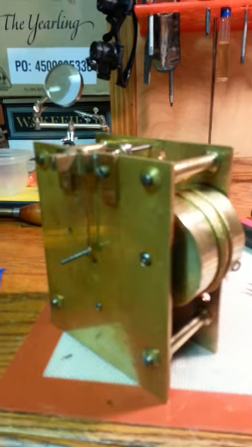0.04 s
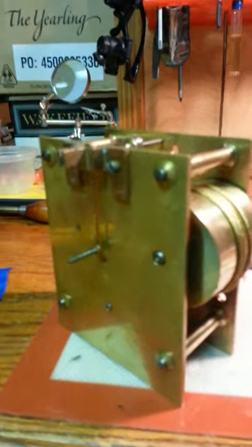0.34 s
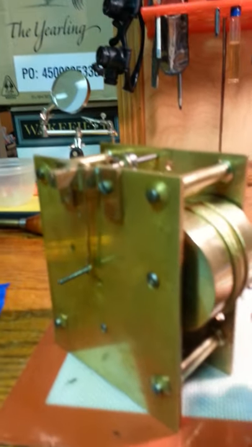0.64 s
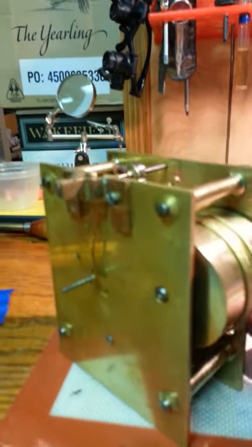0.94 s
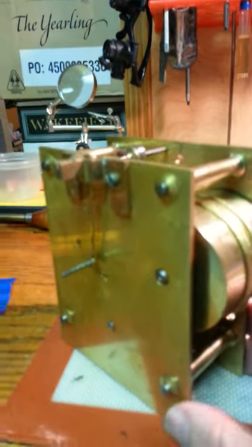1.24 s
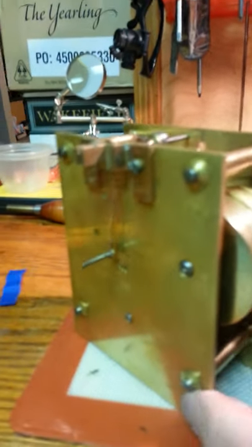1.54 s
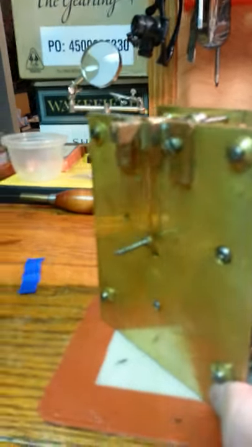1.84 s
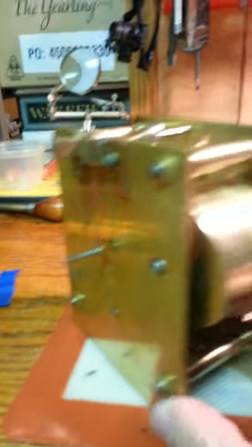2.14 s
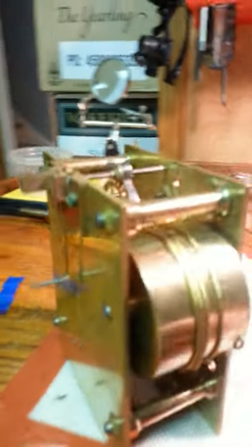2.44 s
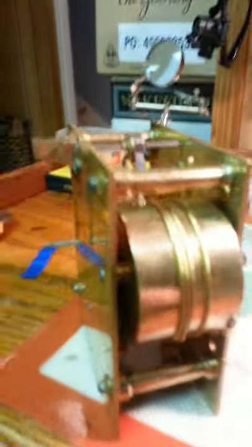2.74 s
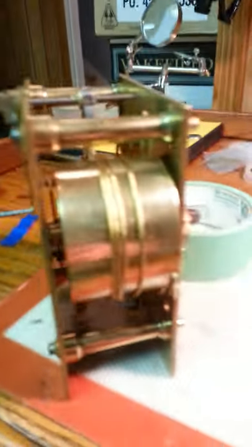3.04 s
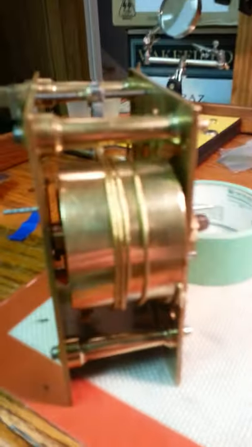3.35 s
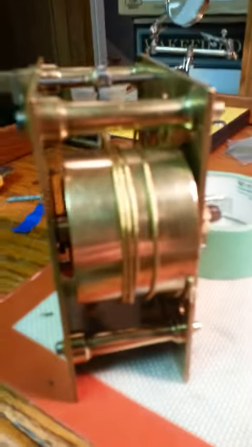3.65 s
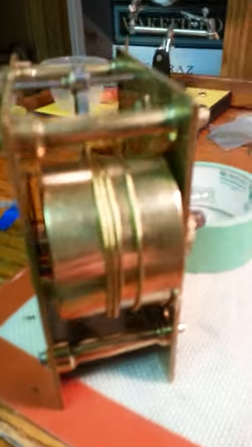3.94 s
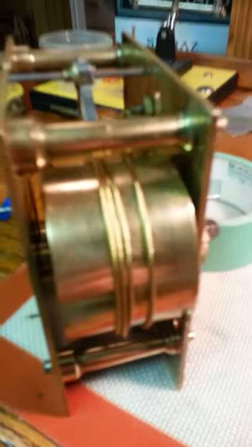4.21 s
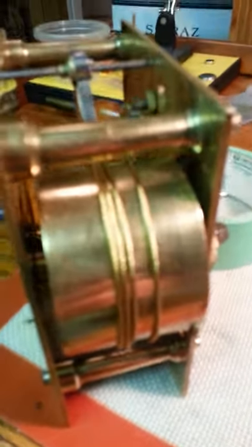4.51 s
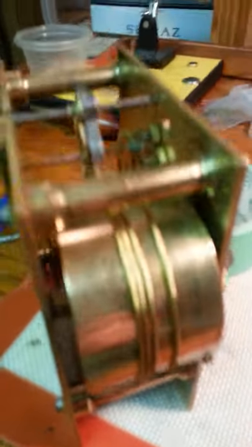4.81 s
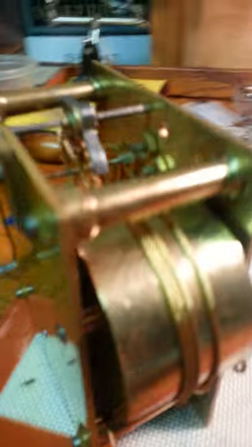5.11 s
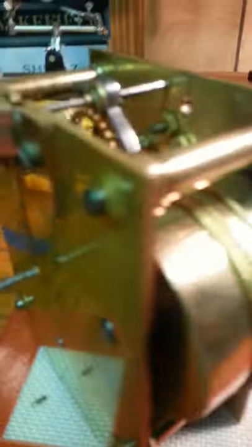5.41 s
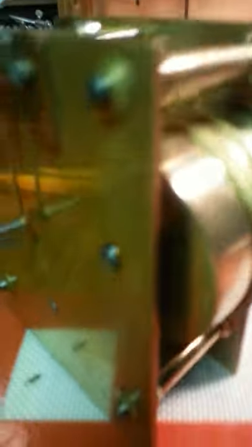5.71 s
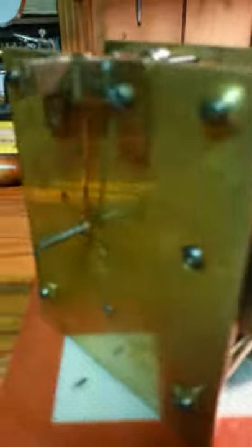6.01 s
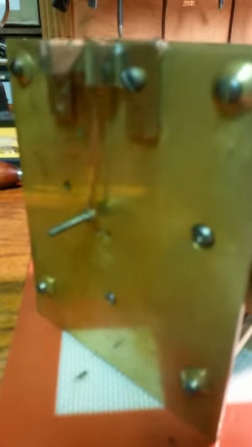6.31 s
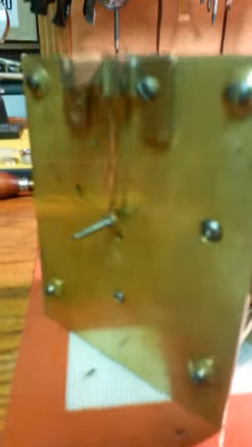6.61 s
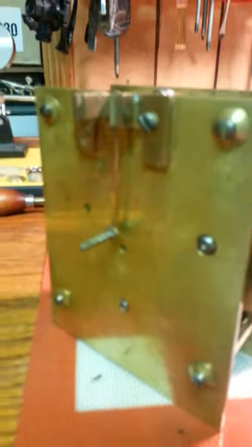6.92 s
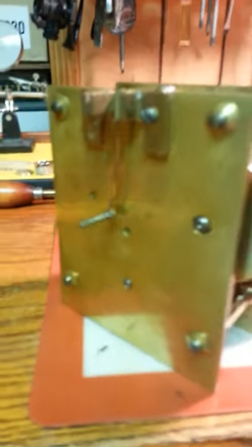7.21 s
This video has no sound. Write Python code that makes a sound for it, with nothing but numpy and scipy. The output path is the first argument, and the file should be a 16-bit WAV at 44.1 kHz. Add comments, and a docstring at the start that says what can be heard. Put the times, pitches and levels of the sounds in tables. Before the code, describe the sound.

Rapid, limping tick-tock of a small clockwork mechanism up close, bright and slightly ringing, with a brief finger bump and rub.

```python
"""Clock movement on a wooden bench

A brass movement ticks fast and out of beat, close to the microphone of a hand-held camera moving round it.
At each beat a tooth slides off its pallet, drops on the other and bounces, ringing the plates and one
steel part and thumping the bench top. Fingers bump and rub now and then. Mains hum and room noise lie
beneath; the camera's noise suppressor lets them swell with every tick."""
import sys
import numpy as np
from scipy import signal
from scipy.fft import rfft, irfft, next_fast_len
from scipy.io import wavfile
from scipy.ndimage import map_coordinates

SR = 44100
rng = np.random.default_rng(int(sys.argv[2]) if len(sys.argv) > 2 else 0)


def transcribe(u):
    """Save the signal u as a 16-bit wav file named by the first command-line argument.

    u: samples, shape (n,) or (channels, n), limited to [-1, 1]; the rate is SR.
    q: integer samples, one column per channel.
    """
    v = np.clip(np.atleast_2d(u).T, -1, 1)
    q = np.round(v * 32767).astype(np.int16)
    wavfile.write(sys.argv[1], SR, q)


N = 320210
TIME = np.arange(N) / SR
TAIL = TIME[:SR // 5]  # time axis of one short sound

# swings of the anchor, uneven with no pendulum to pace it: tick_s, tock_s
SWINGS = [(.271, .363), (.540, .627), (0.78, .881), (1.044, 1.137), (1.305, 1.398), (1.592, 1.679),
          (1.833, 1.918), (2.079, 2.174), (2.317, 2.409), (2.575, 2.662), (2.817, 2.902), (3.042, 3.128),
          (3.272, 3.365), (3.519, 3.611), (3.771, 3.853), (3.991, 4.073), (4.205, 4.288), (4.437, 4.529),
          (4.693, 4.775), (4.919, 5.000), (5.133, 5.215), (5.361, 5.446), (5.596, 5.689), (5.864, 5.957),
          (6.105, 6.189), (6.335, 6.422), (6.569, 6.663), (6.818, 6.908), (7.051, 7.137)]
# spectrum of the crowd of close modes in frame and bench: frequency_hz, density_db
CLATTER = [(90, -25.5), (240, -2), (360, -7), (560, -12), (1050, -21), (1400, -11.5), (1680, -13.5),
           (2300, -3), (3400, -9.5), (4400, 2.5), (5200, -7.5), (6700, 6.5), (8500, -3.5), (10000, -6.5),
           (11500, -11.5), (14400, -20)]


def amp(db):
    """Decibels to amplitude."""
    return 10 ** (np.asarray(db) / 20)


def unit(x):
    """x scaled to rms 1."""
    return x / np.sqrt(np.mean(x ** 2) + 1e-20)


def fade(t, t60):
    """Exponential decay, silent before t = 0."""
    return (t >= 0) * amp(-60 * np.abs(t) / t60)


def along(points, hz):
    """Interpolate (frequency_hz, value) points on a log axis."""
    knots_hz, values = np.transpose(points)
    return np.interp(np.log(hz + 1), np.log(knots_hz + 1), values)


def filtered(x, response):
    """x through a filter whose gain is response(hz)."""
    n = x.shape[-1]
    size = next_fast_len(n + SR // 10)
    return irfft(rfft(x, size) * response(np.fft.rfftfreq(size, 1 / SR)), size)[..., :n]


def smooth(x, seconds):
    """Running mean under a bell."""
    bell = signal.windows.hann(int(seconds * SR))
    padded = np.pad(x, len(bell), "edge")
    return signal.fftconvolve(padded, bell / bell.sum(), "same")[len(bell):-len(bell)]


def wobble(rate):
    """A smooth random curve, rate knots a second."""
    return map_coordinates(rng.standard_normal(int(N * rate / SR) + 4), [TIME * rate])


def sides(pan_db):
    """Left and right gains of mean power 1; pan_db is left minus right."""
    gains = amp([pan_db / 2, -pan_db / 2])
    return gains / np.sqrt(np.mean(gains ** 2, axis=0))


def noise(n, spectrum_db):
    """Coloured stereo noise of rms 1, alike in the bass and unrelated in the treble."""
    # likeness of left and right at the microphone: frequency_hz, correlation
    likeness = [(60, 0), (180, 0.7), (400, 0.42), (900, 0.3), (2000, 0.035)]

    def mid_side_gains(hz):
        turn = np.arccos(np.clip(along(likeness, hz), -1, 1)) / 2
        return amp(spectrum_db(hz)) * [np.cos(turn), np.sin(turn)]

    mid, side = filtered(rng.standard_normal((2, n)), mid_side_gains)
    return unit(np.array([mid + side, mid - side]))


def add(out, start_s, x):
    """Mix x into out from start_s."""
    i = int(start_s * SR)
    out[:, i:i + x.shape[1]] += x[:, :N - i]


def blows(times, db):
    """A train of impulses."""
    return np.bincount((np.ravel(times) * SR).astype(int), amp(db) * np.ones(np.size(times)), N)


def room(air_db=-53, hum_db=-62, waver_db=1.0):
    """Steady room noise and a slightly wavering mains hum."""
    # partials of the hum: pitch_hz, relative_db
    partials = [(179.5, 5), (360, -10)]
    # spectrum of the room noise: frequency_hz, density_db
    air = [(25, 11), (60, -2), (120, 7), (250, 3.5), (500, -1.5), (1000, -7), (3000, -7), (7000, -5),
           (14000, -8)]
    hum = sum(amp(db) * np.sqrt(2) * np.sin(2 * np.pi * hz * TIME) for hz, db in partials)
    hum *= amp(hum_db + waver_db * wobble(4.4))
    return hum + amp(air_db) * noise(N, lambda hz: along(air, hz))


def rustle(grain_db=3):
    """Skin sticks and slips in small grains; each rub swells and dies away."""
    # spectrum of rubbing skin: frequency_hz, density_db
    colour = [(60, 4), (300, -6), (1000, -4), (3000, -7), (7000, 0), (10000, -5), (14000, -22)]
    # fingers on the mat and the camera body: middle_s, level_db, half_length_s
    rubs = [(2.023, -47, 0.074), (2.3, -57.5, 0.046), (2.397, -45, 0.1)]
    grains = unit(noise(N, lambda hz: along(colour, hz)) * amp(grain_db * wobble(310)))
    return grains * sum(amp(db) * np.exp(-((TIME - s) / half) ** 2) for s, db, half in rubs)


def handling(rise_cycles=1.4):
    """Hand bumps, slower and narrower the lower they are; a few light clicks and one brief wheel scrape."""
    # the hand on bench and camera: start_s, level_db, centre_hz, t60_s
    bumps = [(0.319, -46.5, 440, 0.028), (1.008, -47.5, 700, .1), (1.754, -49.5, 388, .032),
             (1.983, -43, 114, 0.22), (2.01, -31, 87, 0.15), (2.4249, -35.5, 556, .11),
             (2.457, -43.5, 490, .14), (5.2226, -42, 378, 0.07)]
    # light clicks and, at 5.165 s, a brief scrape of a wheel: start_s, level_db, t60_s
    clicks_and_scrape = [(1.575, -39.5, 0.027), (1.759, -40, 0.2), (3.838, -27.5, 0.01), (5.165, -39, 0.24),
                         (5.344, -37, 0.033)]
    out = np.zeros((2, N))
    for s, db, centre, t60 in bumps:
        octaves = 1.25 * (centre / 500) ** .7  # half width: harder, higher bumps are broader
        band = noise(len(TAIL), lambda hz: -10 * np.log10(1 + (np.log2((hz + 1) / centre) / octaves) ** 6))
        push = band * (1 - np.exp(-TAIL * centre / rise_cycles)) * fade(TAIL, t60)
        add(out, s, amp(db) * push / push[:, :SR // 50].std())
    for s, db, t60 in clicks_and_scrape:
        add(out, s, amp(db) * noise(len(TAIL), lambda hz: along(CLATTER, hz)) * fade(TAIL, t60))
    return out


def bench(pitch_hz=177, t60=.17, level_db=-51):
    """Every beat thumps the bench top, which booms briefly at its low resonance."""
    t = TIME[:SR // 2]
    boom = np.sin(2 * np.pi * pitch_hz * t) * fade(t, t60)
    return signal.oaconvolve(blows(SWINGS, level_db), boom)[:N]


def steel(swell_s=0.039, waver_db=2, faint_db=-55, pan_db=4.5):
    """A steel part takes up each blow slowly; some beats set it singing, and one mode lingers."""
    # its lightly damped modes: pitch_hz, gain_db, t60_s, growth_db_per_db of a harder blow
    modes = [(5571, -7, 1.4, 1.45), (5583, 21, .13, 1)]
    # beats that set it singing: start_s, force_db
    hard_blows = [(1.045, -45), (1.307, -45.5), (1.401, -50), (3.04, -39), (3.274, -45), (3.518, -50),
                  (3.772, -46.5), (3.992, -52), (4.207, -48), (5.135, -36.5), (5.36, -39), (5.596, -32.5),
                  (5.691, -37.5), (6.189, -47.5), (7.053, -48)]
    t = TIME[:SR]
    times, db = np.transpose(hard_blows)
    swell = 1 - np.exp(-(t / swell_s) ** 2)
    out = np.zeros((2, N))
    for hz, gain_db, t60, growth in modes:
        tone = np.sin(2 * np.pi * hz * t + [[0], [1]])  # the right side leads by a radian
        ring = amp(gain_db) * fade(t, t60) * tone * swell
        force = blows(SWINGS, faint_db) + blows(times, db.max() + growth * (db - db.max()))
        out += signal.oaconvolve(force[None], ring, axes=1)[:, :N]
    return out * amp(waver_db * wobble(40)) * sides(pan_db)[:, None]


def dense_ring(crack_db=8, crack_t60=0.0098):
    """The crowd of close modes after one blow: a sharp direct crack, then a tail that dies by frequency."""
    # decay of frame and bench together: frequency_hz, t60_s
    ring_times = [(200, 0.086), (700, 0.26), (2000, 0.14), (6000, 0.09), (13000, 0.052)]
    hz, t, spectra = signal.stft(noise(len(TAIL), lambda hz: along(CLATTER, hz)), SR, nperseg=128)
    spectra *= fade(t, along(ring_times, hz)[:, None])
    tail = signal.istft(spectra, SR, nperseg=128)[1][:, :len(TAIL)]
    return unit(tail * (1 + amp(crack_db) * fade(TAIL, crack_t60)))


def contacts(slide_s, unlock_db=-10, slide_db=-7, rise_db=8, bounce_t60=0.059, gap_s=.0019, bounces=7):
    """Forces of one beat: the tooth unlocks, scrapes ever harder along the pallet, drops and chatters."""
    force = np.zeros(len(TAIL))
    drop = int(slide_s * SR) + 1
    scrape = rng.standard_normal(len(TAIL))[:drop] ** 3 * amp(rise_db * np.linspace(0, 1, drop))
    force[:drop] = amp(slide_db) * scrape / np.linalg.norm(scrape)
    force[0] += amp(unlock_db)
    force[drop] += .8
    after_s = np.cumsum(gap_s * rng.uniform(.5, 1.5, bounces))
    # the wheel's weight follows the first touch, so the second contact is the hardest
    chatter = fade(after_s - after_s[0], bounce_t60) * rng.choice([-1, 1], bounces)
    force[drop + (after_s * SR).astype(int)] += chatter
    return force


def beats():
    """Yield each beat's time, slide and band levels; a late swing has a weaker tick, a stronger tock."""
    # the pallets, tick then tock: slide_s, plate_db, treble_db, loss_db_per_s of lateness
    pallets = [(.0038, -39.5, -34.5, 37), (.0013, -39, -31.5, -10)]
    periods = np.diff(np.array(SWINGS)[:, 0])
    lateness = np.r_[0, periods - periods.mean()]
    for swing, late_s in zip(SWINGS, lateness):
        for drop_s, (slide_s, plate_db, treble_db, loss) in zip(swing, pallets):
            yield drop_s, slide_s, plate_db - loss * late_s, treble_db - loss * late_s


def escapement(scatter_db=2.0, detune_hz=14, steady_db=-2, split_hz=5300, top_hz=8800):
    """Each beat rings the same frame; the microphone's angle and nearness set its modes, level and pan."""
    # modes of the brass frame and its wheels: pitch_hz, front_db, open_side_db, t60_s
    frame = [(575, -26, -9, .14), (1390, -6, -11, .13), (2015, -3, 5, .12), (2085, -9, 0, .1),
             (2295, -3, -11, .12), (2870, -9, -17, .12), (3470, -18, -19, .17), (3890, -8, -3, .13),
             (4063, -6, -4, .16), (4272, -7, 3, .11), (4525, -12, -3, .1), (5755, -6, -4, .14),
             (6390, 2, -15, .11), (6584, 0, -3, .12), (7030, -4, -3, .1), (7260, -4, -6, .14),
             (7500, -12, -4, .16), (7840, -19, -6, .16), (8091, 2, -2, .13), (8254, -9, 0, .12),
             (8519, 3, -1, .12), (8894, -9, -6, .13), (9390, -8, -16, .13), (9601, -11, -14, .13),
             (10053, -7, -10, .14), (10500, -14, -12, .13), (10800, -14, -23, .13), (14100, -15, -24, .1)]
    # the microphone's path: time_s, angle (0 front plate, 1 open side), nearness_db
    path = [(.3, 0.029, -1), (1.15, .02, 1.1), (1.6, .05, -1), (2.05, 0.033, 1), (2.65, 0.79, -0.04),
            (3.3, 0.98, 1.57), (4.6, 0.87, 0.5), (5.45, 0.46, 2.5), (6.15, 0.27, 3.5), (7.1, 0.12, 2.04)]
    # stereo lean of a tick within each band: frequency_hz, pan_db
    tilt = [(250, 1), (1500, 2), (2400, 5), (4500, 4), (6000, 0), (6800, -10), (8500, -12), (11500, -8)]
    hz, front_db, open_db, t60 = np.transpose(frame)
    path_s, angles, nearness = np.transpose(path)
    phase = rng.uniform(0, 2 * np.pi, (2, len(hz), 1))
    decay = fade(TAIL, t60[:, None])
    # part of the treble ring repeats; fresh random clatter varies each beat
    steady = filtered(dense_ring(), lambda f: 1 / (1 + (5000 / (f + 1)) ** 8))
    out = np.zeros((2, N))
    for drop_s, slide_s, plate_db, treble_db in beats():
        angle = np.interp(drop_s, path_s, angles)
        near_db = np.interp(drop_s, path_s, nearness)
        pitch = hz + detune_hz * rng.standard_normal(len(hz))  # random detuning: the ring sounds less pure
        modes = np.sin(2 * np.pi * pitch[:, None] * TAIL + phase) * decay
        mode_db = front_db + angle * (open_db - front_db) + scatter_db * rng.standard_normal(len(hz))
        ring = amp(-4 + 3.5 * angle) * unit(amp(mode_db) @ modes)  # clearer at the open side
        response = amp(steady_db) * steady + dense_ring() + ring
        tick = signal.fftconvolve(response, contacts(slide_s)[None], axes=1)[:, :len(TAIL)]
        # close up, the highest treble gains extra
        top_lift = lambda f: amp(1.1 * near_db * np.clip(2 * (f / top_hz - 1), 0, 1))
        tick = filtered(tick, lambda f: sides(along(tilt, f)) * top_lift(f))
        plate = filtered(tick, lambda f: 1 / (1 + (f / split_hz) ** 16))
        treble = tick - plate
        for band, level_db, pan_db in (
                (plate, plate_db + near_db, 1.6 + 5.5 * angle),
                (treble, treble_db + 1.28 * near_db - 3.5 * angle, -4.5 - 1.35 * near_db)):
            attack_rms = band[:, int(slide_s * SR):][:, :SR // 40].std(axis=1)
            add(out, drop_s - slide_s, band * (amp(level_db) * sides(pan_db) / attack_rms)[:, None])
    return out


def scene():
    """The clock, the hand and the room as they reach the microphone."""
    return escapement() + steel() + bench() + handling() + rustle() + room()


def suppressor(x, threshold_db=-42, slope=2, depth_db=28, release_db_per_s=170, window_s=0.034):
    """Turns all down while the level above the bass is low; opens just ahead of a tick, closes after it."""
    power = np.mean(filtered(x, lambda hz: hz > 500) ** 2, axis=0)
    level_db = 10 * np.log10(np.abs(smooth(power, window_s)) + 1e-12)
    wanted_db = np.clip(slope * (level_db - threshold_db), -depth_db, 0)
    release_db = release_db_per_s * TIME
    held_db = np.maximum.accumulate(wanted_db + release_db) - release_db
    return x * amp(smooth(held_db, window_s))


def record(dry, on_s=0.118, full_s=0.378, fade_db_per_s=85, low_cut_hz=70, high_cut_hz=14600):
    """The camera fades in after a moment, suppresses steady noise, thins the deep bass and cuts the top."""
    fade_in = (TIME > on_s) * amp(np.clip(fade_db_per_s * (TIME - full_s), -6, 0))
    thinned = filtered(suppressor(dry * fade_in), lambda hz: 1j * hz / (low_cut_hz + 1j * hz))
    return filtered(thinned, lambda hz: 1 / np.sqrt(1 + (hz / high_cut_hz) ** 120))


dry = scene()
out = record(dry)
transcribe(out)
```